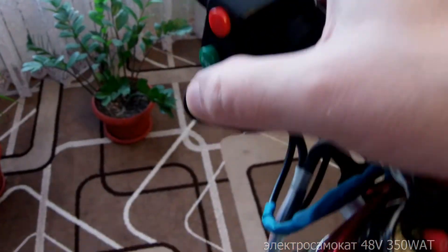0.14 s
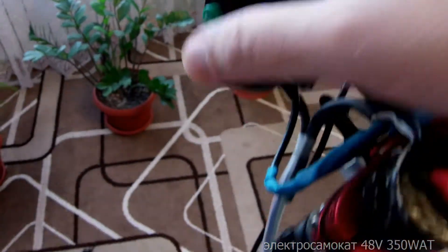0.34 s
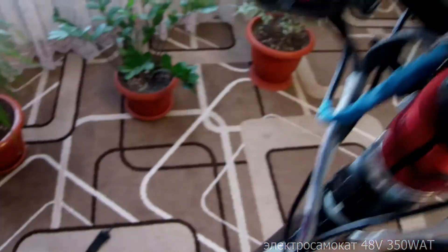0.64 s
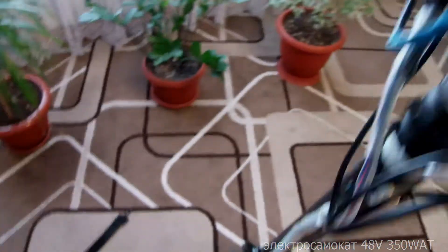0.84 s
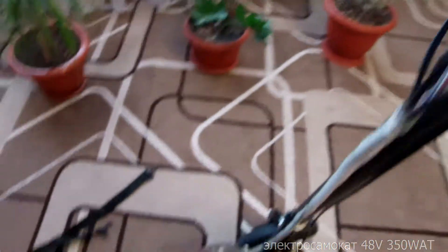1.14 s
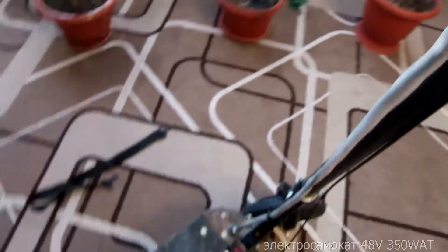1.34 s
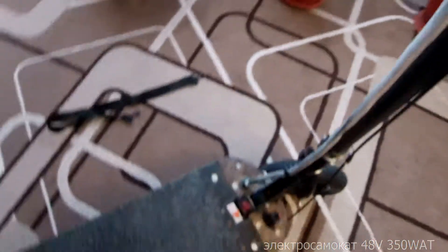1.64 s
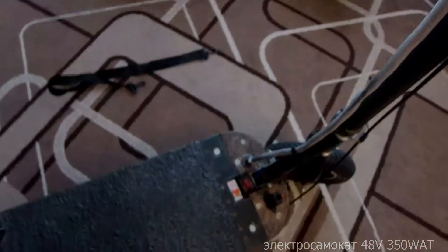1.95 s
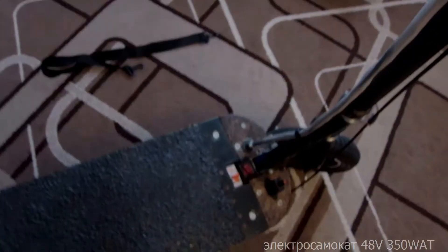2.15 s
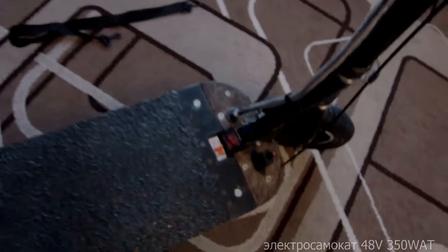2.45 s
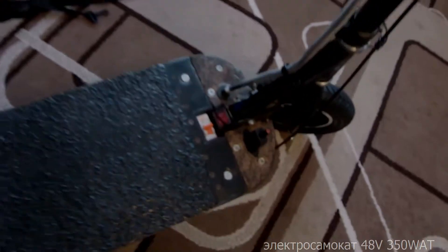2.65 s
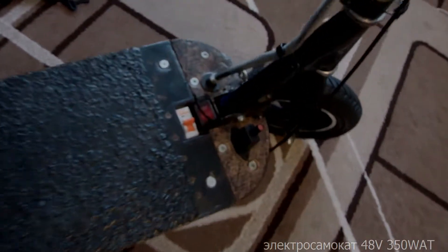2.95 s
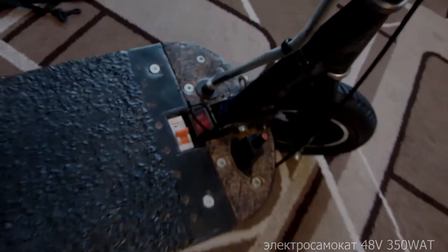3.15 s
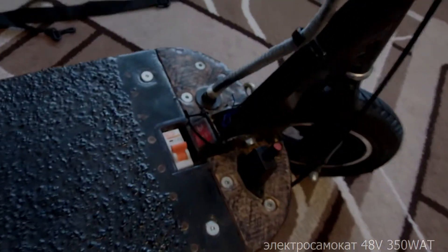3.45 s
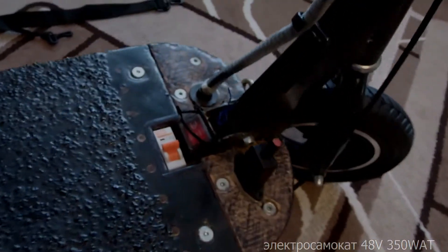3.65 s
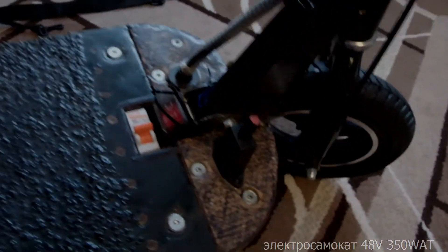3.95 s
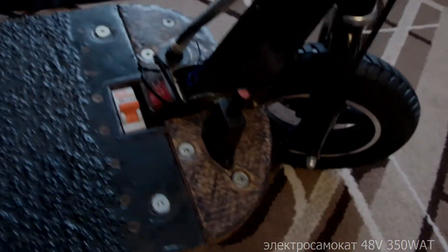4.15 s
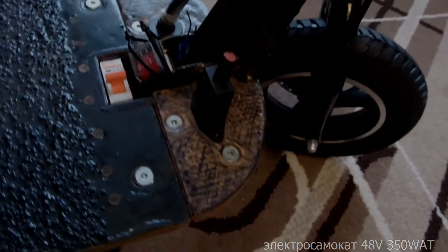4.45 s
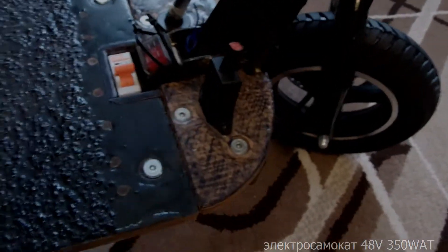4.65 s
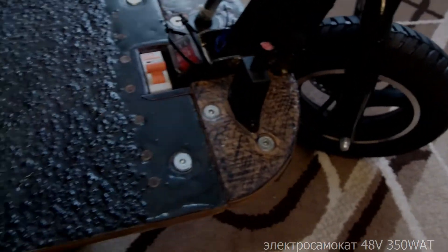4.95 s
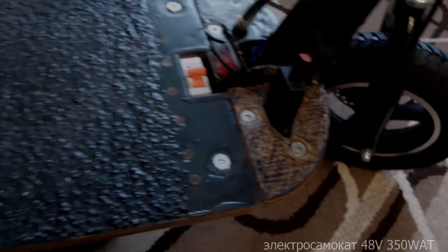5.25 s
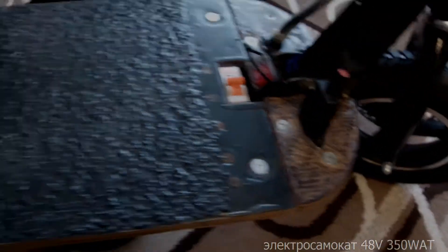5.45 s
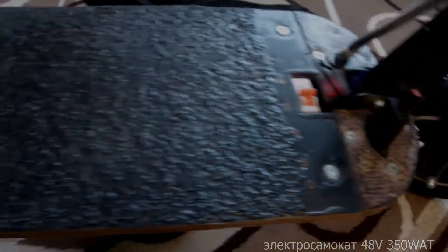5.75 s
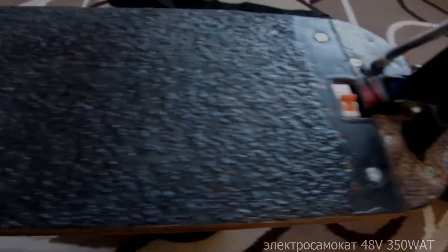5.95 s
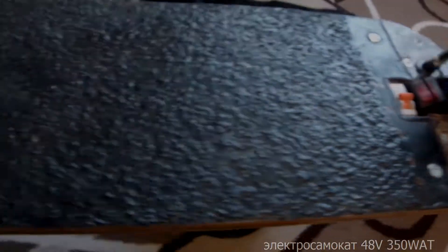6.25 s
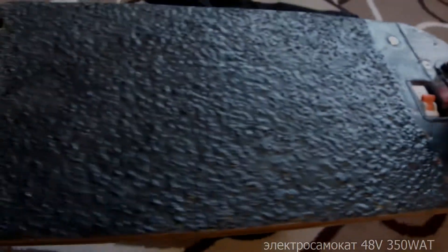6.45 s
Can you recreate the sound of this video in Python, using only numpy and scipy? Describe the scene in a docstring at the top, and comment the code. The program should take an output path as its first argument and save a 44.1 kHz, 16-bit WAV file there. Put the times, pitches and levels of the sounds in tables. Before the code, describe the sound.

In a carpeted living room, a hand makes four short, quiet rubbing swishes on a small electric scooter. Just before one second the motor starts and the chain begins a grainy metallic whir, loosening into rattle as the wheel spins free. Swells, slaps and knocks recur about every 1.8 seconds. The handheld microphone moves close, making it louder, then shifts behind the deck, dulling the treble. Low rumble, hiss and a very thin whine continue underneath.

```python
"""In a living room, a hand gives four short rubbing swishes on a small electric scooter, then its motor starts.
The wheel spins free: the chain's contacts, a burst of tiny impacts each, ring deck, frame, sprockets and rollers.
Every lap of the chain brings back its swells, surges, slaps and knocks; the controller whistles faintly.
The microphone nears the wheel, then moves back over the deck, which hides the chain.
Rumble, hiss and a thin whine run throughout."""
import sys
import numpy as np
from scipy import signal
from scipy.fft import rfft, irfft
from scipy.io import wavfile
from scipy.ndimage import uniform_filter1d

SR = 44100
rng = np.random.default_rng(int(sys.argv[2]) if len(sys.argv) > 2 else 0)


def persist_wave(psi):
    """Save psi, clipped to +-1, as 16-bit WAV."""
    counts = np.round(np.clip(psi, -1, 1) * 32767).astype(np.int16)
    wavfile.write(sys.argv[1], SR, np.atleast_2d(counts).T)


N = 291677
TIME = np.arange(N) / SR

# A run of stiff links that knocks on every lap:
# (time of one pass, repeated every lap [s], relative click power [dB, taken as amplitude gain], relative thud [dB])
STIFF_LINKS = [(3.0245, 7, -2.5), (3.0349, -9, -3), (3.0665, 16, 0), (3.0776, 6, -5)]
# Tight spots of the chain: at each the whir swells; at most of them the links then race and slap:
# (time of one pass, repeated every lap [s], swell [dB], swell width [s], surge [links/s], slap [0-1])
TIGHT_SPOTS = [(1.7, 1.85, 0.068, 17, 0.48), (2.28, 2, 0.044, 22, 0.68), (2.51, 2.5, 0.038, 0, 0.08),
               (2.81, 3, 0.043, 21, 0.7)]
# The motor takes up the load and the chain goes slack as the wheel spins free:
# (time [s], effort [dB], slackness [0-1])
SPIN_UP = [(.86, -3.5, 0.1), (1.0, -4.5, 0.3), (1.18, 1.5, 0.28), (1.3, -2, 0.42), (1.5, -5.5, 0.93),
           (1.62, -2.5, 1), (1.85, -0.3, 0.97)]
# The microphone's place, near the wheel or behind the deck: (time [s], closeness [0-1], hidden [0-1])
MICROPHONE = [(2.1, 0, 0), (3.28, 0.24, 0), (3.58, 0.76, 0.08), (4.2, 0.9, .05), (5.0, 0.78, 0.14),
              (5.75, .86, 0.72), (6.1, 0.35, 0.98), (6.6, 0.2, 0.9)]
# Resonances of each part, levels relative within the part:
# (frequency [Hz], width [Hz], level [dB per Hz], gain close up [dB])
DECK_MODES = [(348, 47, -23.5, 1.5), (584.3, 91, -4.5, -3.5), (663, 78, -4, 1), (726.8, 44, 0, 1),
              (789.6, 134, -5.5, 0), (935, 139, -10.5, -1), (1250, 306, -14.5, -1)]
FRAME_MODES = [(1638.5, 104, -4.5, -2.5), (1761, 137, -5.5, -2.5), (2047, 167, -2.5, 0.5),
               (2104, 87, -1.5, -4), (2254, 125, -4.5, 4.5), (2438, 238, -8, 2.5), (2920, 372, -9.5, 0),
               (3197, 200, -20, -0.5)]
SPROCKET_MODES = [(3580, 85, -8, -2.5), (3838, 165, -6, -1), (4364, 323, -1.5, -3.5),
                  (4930, 330, -14.5, 3.5), (5390, 460, -16, 1.5), (6270, 300, -7, -1)]
ROLLER_MODES = [(6790, 380, -11, 6), (7230, 270, 0, 1), (7700, 300, -4, -4), (8050, 330, -1, -3),
                (8550, 380, -17, 9), (8950, 260, -9, 1), (12500, 2500, -38, 7)]
# Side tones of the controller's carrier, spaced by the link rate: (multiple [1], relative level [dB])
SIDE_TONES = [(-3, -11), (-2, -13), (-1, -12), (1, -7), (2, -2), (3, 0), (5, -5)]
# Strokes of a hand rubbing before the start: (time [s], length [s], level before STROKE_GAIN_DB [dB])
STROKES = [(-0.001, 0.062, -55), (0.14, 0.062, -55), (0.282, 0.036, -54), (0.402, 0.097, -52)]
# Resonances that the rubbing stirs: (frequency [Hz], width [Hz], relative level [dB per Hz])
BRUSH_MODES = [(715, 194, -6), (940, 134, -4.5), (1330, 210, -8), (1660, 160, -2), (1910, 160, -5),
               (2122, 170, 1), (2320, 300, -3), (2740, 290, -6.5), (3156, 175, -6), (3700, 450, -16.5),
               (4340, 230, -12), (4850, 280, -20), (5830, 1500, -28), (6850, 260, -12), (7300, 210, -5.5),
               (8030, 520, -9.5), (8900, 500, -20)]
# Background rumble and hiss: (frequency [Hz], relative level [dB per Hz])
FLOOR_SPECTRUM = [(10, 1), (25, 1), (40, -1.5), (80, -5), (160, -10), (260, -13.5), (450, -16), (1000, -24),
                  (3000, -29), (10000, -33), (15000, -32)]
# Thin electronic whine: (frequency [Hz], level [dB rms])
WHINE_TONES = [(14375, -92), (14425, -89.5), (14475, -95)]

START_S, SPIN_UP_S = .8, .04  # the motor fades in as the hand fades out
LAP_START_S, LAP_S = 1.8, 1.818
LINKS_PER_S, SURGE_AFTER_S, SURGE_RISE_S, SURGE_FADE_S = 81, 0.0946, .04, .21
SLAP_AFTER_S, SLAP_WIDTH_S, LEAST_SLAP = 0.21, 0.14, 0.11
DRIVE_DB, CLOSE_GAIN_DB = -57, 7
# each part beside the frame, in dB: level when far, change close up, change when hidden, change with a taut chain
DECK_LEVELS_DB = 0.38, -.9, -1.26, -5.3
SPROCKET_LEVELS_DB = -8.5, -1.2, -6.5, -6
ROLLER_LEVELS_DB = -2.5, -2.5, -5.5, -3
JOLTS_DB = -13  # beside the ringing deck
BOUNCE_DB, BOUNCE_FAR_S, BOUNCE_NEAR_S = -17, 0.000527, 0.000566
CARRIER_HZ, WHISTLE_DB = 5888, -11.5  # level beside the sprocket
WHISTLE_WOBBLE = .22  # share of the chain's surges that reaches the motor
STROKE_RISE_DB_PER_S, STROKE_SAG_DB_PER_S, STROKE_FALL_DB_PER_S = 450, 29, 153
STROKE_GAIN_DB, RESTING_HAND_DB = 1.1, -63.5
ROOM_T60_S, ROOM_DB = .22, -9
FLOOR_DB, WHINE_HISS_DB = -64.5, -89
CUTOFF_HZ = 15100


def scooter():
    """The same chain contacts return with each lap and drive all four parts; the controller sings along."""
    when = LAP_START_S + TIME[:round(LAP_S * SR)]
    place = np.round((TIME - LAP_START_S) * SR).astype(int) % len(when)  # sample of the lap heard now
    effort_db, slackness = columns_at(SPIN_UP, TIME)
    slackness = np.clip(slackness, 0, 1)
    taut = 1 - slackness
    closeness, hidden = columns_at(MICROPHONE, TIME)
    swell_db, link_rate, _ = tension(when)

    heavy, firm, light = (np.sqrt(taut + slackness * force[place] ** 2) for force in lap_forces(when))
    deck_db, sprocket_db, rollers_db = (
        far_db + close_db * closeness + hidden_db * hidden + taut_db * taut
        for far_db, close_db, hidden_db, taut_db in (DECK_LEVELS_DB, SPROCKET_LEVELS_DB, ROLLER_LEVELS_DB))

    jolts = from_db(JOLTS_DB) * thuds(when, place, body_hz=690, width_hz=200)
    deck_ring = part(DECK_MODES, heavy, closeness, grains_per_s=6000)
    deck = from_db(deck_db) * (deck_ring + slackness * jolts)
    frame = part(FRAME_MODES, firm, closeness, grains_per_s=8000)
    sprocket = from_db(sprocket_db) * part(SPROCKET_MODES, firm, closeness, grains_per_s=9000)
    rollers = from_db(rollers_db) * part(ROLLER_MODES, light, closeness, grains_per_s=15000)
    chain_treble = bounce(sprocket + rollers, closeness)

    motor_rate = link_rate.mean() + WHISTLE_WOBBLE * (link_rate[place] - link_rate.mean())
    controller = from_db(sprocket_db + WHISTLE_DB) * whistle(motor_rate, waver_db=3)

    drive_db = DRIVE_DB + effort_db + slackness * swell_db[place] + CLOSE_GAIN_DB * closeness
    running = np.clip((TIME - START_S) / SPIN_UP_S, 0, 1)
    return running * from_db(drive_db) * (deck + frame + chain_treble + controller)


def tension(when):
    """Swell in dB, link rate and slap as the tight spots pass over the sprocket."""
    swell_db, rate, slap = 0, LINKS_PER_S, LEAST_SLAP
    for s, db, width_s, surge, slap_depth in TIGHT_SPOTS:
        swell_db = swell_db + db * bell(since(when, s), width_s)
        age = since(when, s + SURGE_AFTER_S)
        surge_shape = np.where(age < 0, bell(age, SURGE_RISE_S), np.exp(-np.abs(age) / SURGE_FADE_S))
        rate = rate + surge * surge_shape
        slap = slap + slap_depth * bell(since(when, s + SLAP_AFTER_S), SLAP_WIDTH_S)
    return swell_db, rate, slap


def lap_forces(when):
    """Heavy, firm and light contact over one lap: the lighter, the more slap and rattle."""
    chain = chain_lap(when, sharpness=2.6, uneven_db=1.5, rattles_per_s=340, rattle_spread_db=3, rattle_s=.00045)
    click = knocks(when, width_s=.0013)
    heavy = contact(*chain, click, slap_share=1.1, rattle_share=.6, knock_share=.3)
    firm = contact(*chain, click, slap_share=1.15, rattle_share=.7, knock_share=.5)
    light = contact(*chain, click, slap_share=1.45, rattle_share=1, knock_share=.5)
    return heavy, firm, light


def chain_lap(when, sharpness, uneven_db, rattles_per_s, rattle_spread_db, rattle_s):
    """Contact power over one lap: links seating on the sprocket in turn, loose rollers rattling between them."""
    _, rate, slap = tension(when)
    links = np.cumsum(rate) / SR
    strength = from_db(uneven_db * rng.standard_normal(256))[np.round(links).astype(int)]
    seating = strength * (.5 + .5 * np.cos(2 * np.pi * links)) ** sharpness

    rattle_strength = from_db(rattle_spread_db * rng.standard_normal(len(when)))
    touches = (rng.random(len(when)) < rattles_per_s / SR) * rattle_strength
    fade = np.exp(-1 / (rattle_s * SR))
    rattle = signal.lfilter([1], [1, -2 * fade, fade * fade], touches + 1e-18)  # swift rise, then decay
    return np.clip(slap, 0, 1), seating / seating.mean(), rattle / rattle.mean()


def knocks(when, width_s):
    """Each stiff link adds a short swell of contact power."""
    return sum(from_db(click_db) * bell(when - s, width_s) for s, click_db, _ in STIFF_LINKS)


def contact(slap, seating, rattle, knock, slap_share, rattle_share, knock_share):
    """Force envelope: slapping links take over from rubbing and rattling wherever the chain runs slack."""
    slapping = np.clip(slap_share * slap, 0, .95)
    loose = np.clip(rattle_share, 0, 1)
    rubbing_and_rattling = 1 - loose + loose * rattle
    power = slapping * seating + (1 - slapping) * rubbing_and_rattling + knock_share * knock
    # the mean power stays with the drive: hard contacts take it from their neighbours
    return np.sqrt(np.maximum(power, 0) / uniform_filter1d(power, size=3000, mode="wrap"))


def part(modes, force, closeness, grains_per_s):
    """Every contact is a cluster of tiny metal impacts that ring the modes of one part."""
    impacts = force * (rng.random(N) < grains_per_s / SR)
    rings = 0
    for hz, width_hz, db, near_db in modes:
        ring = resonate(impacts * rng.standard_normal(N), hz, width_hz)
        rings = rings + from_db(db + near_db * closeness) * ring
    return rms_one(rings)


def thuds(when, place, body_hz, width_hz):
    """A stiff link jolts the deck with one blow."""
    blows = np.zeros(len(when))
    for s, _, thud_db in STIFF_LINKS:
        early_s = 1 / (2 * width_hz)  # allows for the slow onset of the resonance
        blows[np.searchsorted(when, s - early_s)] = from_db(thud_db)
    return rms_one(resonate(blows[place], body_hz, width_hz))


def bounce(x, closeness):
    """The deck's reflection comes later as the microphone nears, so its notches slide down."""
    lag_s = BOUNCE_FAR_S + (BOUNCE_NEAR_S - BOUNCE_FAR_S) * closeness ** 2
    return x + from_db(BOUNCE_DB) * np.interp(TIME - lag_s, TIME, x)


def whistle(link_rate, waver_db):
    """The windings sing around the switching carrier; side tones spread and close with the speed."""
    turn = 2 * np.pi * np.cumsum(link_rate) / SR
    out = 0
    for multiple, db in SIDE_TONES:
        waver = np.interp(TIME, np.linspace(0, TIME[-1], num=90), rng.standard_normal(90))
        tone = np.sin(2 * np.pi * CARRIER_HZ * TIME + multiple * turn)
        out = out + from_db(db + waver_db * waver) * tone
    return rms_one(out)


def hand():
    """Smooth strokes of rubbing while a hand works the handlebar, dying away as the motor takes over."""
    power = from_db(RESTING_HAND_DB) ** 2
    for s, length_s, stroke_db in STROKES:
        age = TIME - s
        rise_db = STROKE_RISE_DB_PER_S * np.maximum(-age, 0)
        sag_db = STROKE_SAG_DB_PER_S * np.clip(age, 0, length_s)
        fall_db = STROKE_FALL_DB_PER_S * np.maximum(age - length_s, 0)
        power = power + from_db(stroke_db + STROKE_GAIN_DB - (rise_db + sag_db + fall_db)) ** 2
    rub = sum(from_db(db) * resonate(rng.standard_normal(N), hz, width_hz) for hz, width_hz, db in BRUSH_MODES)
    dying_away = np.clip(1 - (TIME - START_S) / SPIN_UP_S, 0, 1)
    return np.sqrt(power) * dying_away * rms_one(rub)


def room(x):
    """Carpet and curtains leave a short tail of scattered reflections."""
    age = TIME[:SR // 2]
    tail = rng.standard_normal(len(age)) * from_db(-60 * age / ROOM_T60_S) * (age > .004)
    return x + from_db(ROOM_DB) * signal.fftconvolve(x, tail / np.linalg.norm(tail))[:N]


def background():
    """Low room rumble, microphone hiss and a thin steady whine wrapped in narrow hiss."""
    whine = 0
    for hz, db in WHINE_TONES:
        whine = whine + np.sqrt(2) * from_db(db) * np.sin(2 * np.pi * (hz * TIME + rng.random()))
    whine_hiss = rms_one(resonate(rng.standard_normal(N), WHINE_TONES[1][0], width_hz=300))
    return from_db(FLOOR_DB) * coloured_noise(FLOOR_SPECTRUM) + whine + from_db(WHINE_HISS_DB) * whine_hiss


def coloured_noise(spectrum):
    """Noise with the given spectrum, rms 1."""
    hz, db = np.transpose(spectrum)
    bins_hz = np.maximum(np.arange(N // 2 + 1) * SR / N, 1)
    gain = from_db(np.interp(np.log(bins_hz), np.log(hz), db))
    return rms_one(irfft(rfft(rng.standard_normal(N)) * gain, N))


def resonate(x, hz, width_hz):
    """A resonance with steep skirts and gain 1 on top."""
    edges = np.clip([hz - width_hz / 2, hz + width_hz / 2], 10, .45 * SR)
    return signal.sosfilt(signal.butter(2, edges, "band", fs=SR, output="sos"), x)


def since(when, s):
    """Time since the nearest return of a point on the chain; negative just before it."""
    return (when - s + LAP_S / 2) % LAP_S - LAP_S / 2


def bell(offset, width):
    """A smooth bump of height 1."""
    return np.exp(-.5 * (offset / width) ** 2)


def columns_at(rows, when):
    """Each column of a curve table, read at the given times."""
    s, *columns = np.transpose(rows)
    return [np.interp(when, s, column) for column in columns]


def from_db(db):
    """Decibels to gain."""
    return 10 ** (np.asarray(db) / 20)


def rms_one(x):
    """Scale to rms 1."""
    return x / np.sqrt(np.mean(x ** 2) + 1e-20)


def scene():
    """Scooter and hand sound in the room, over the background."""
    return (room(scooter() + hand()) + background())[None]


def record(dry):
    """The top is cut steeply."""
    return signal.sosfilt(signal.ellip(12, .1, 70, CUTOFF_HZ, fs=SR, output="sos"), dry)


dry = scene()
out = record(dry)
persist_wave(out)
```